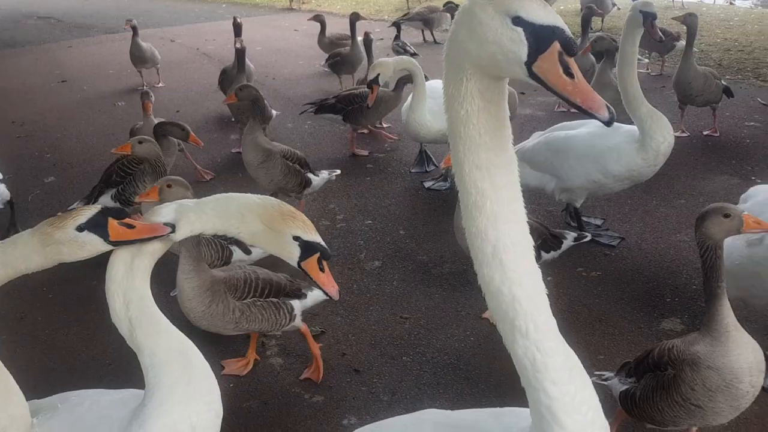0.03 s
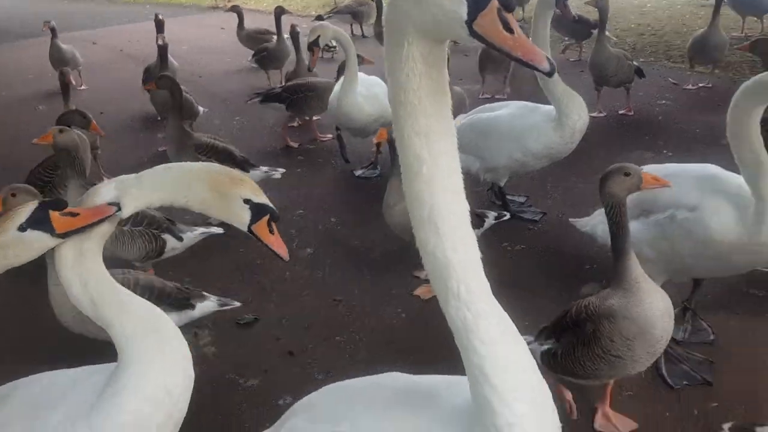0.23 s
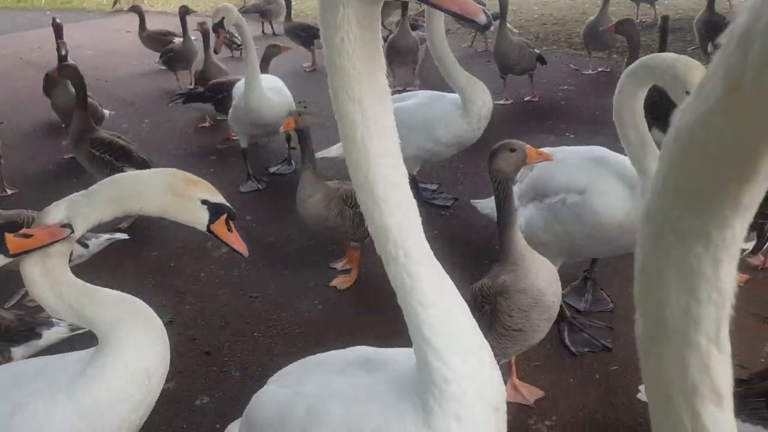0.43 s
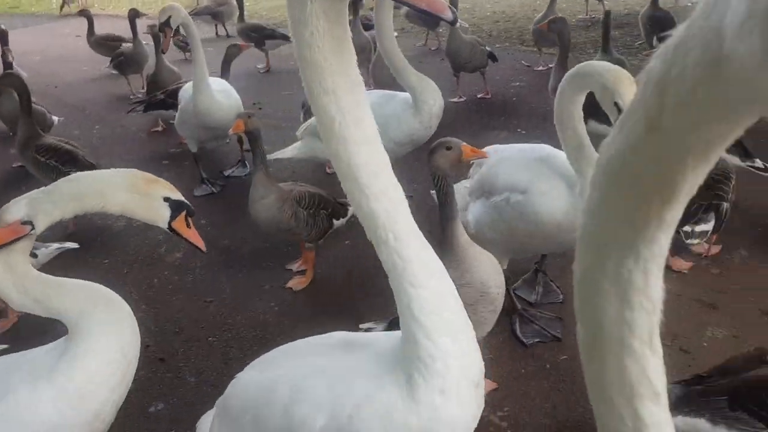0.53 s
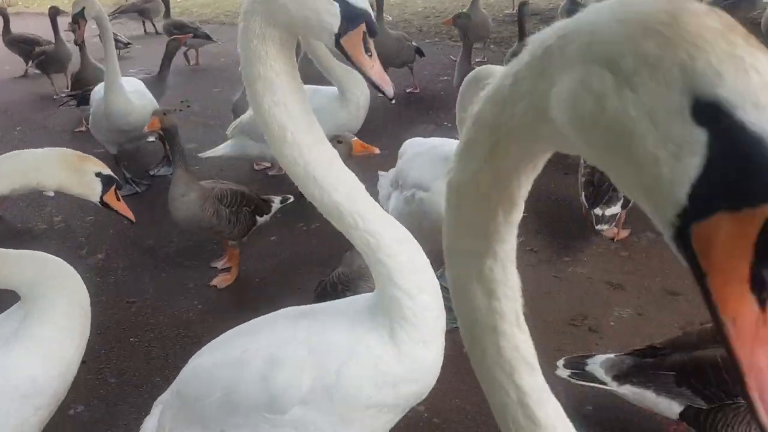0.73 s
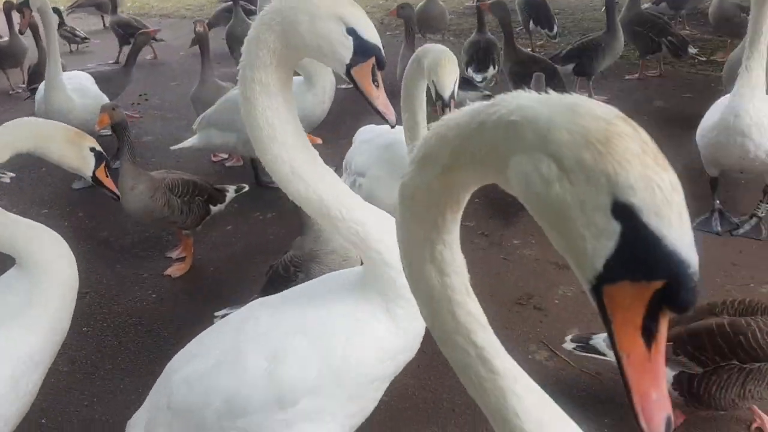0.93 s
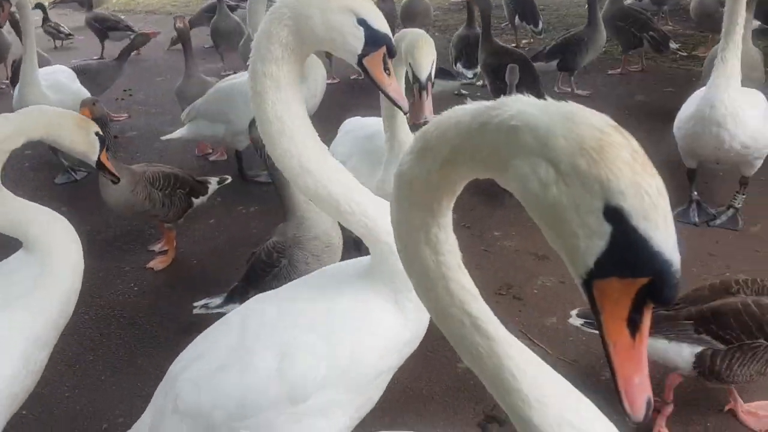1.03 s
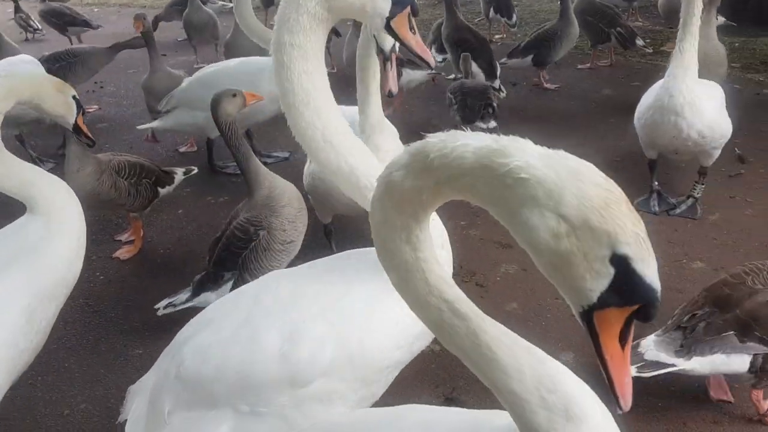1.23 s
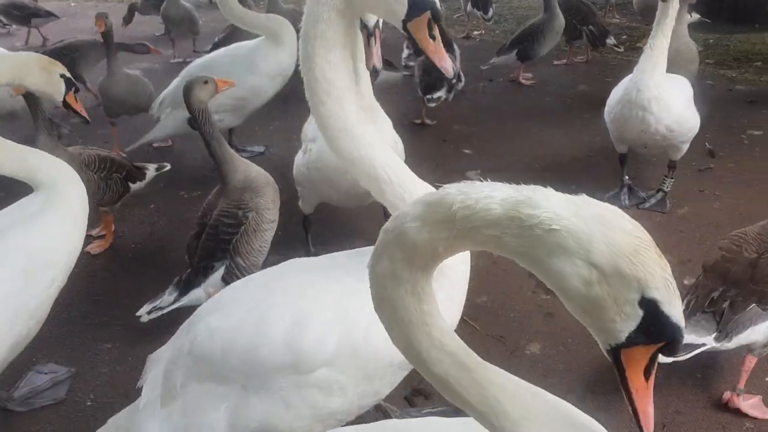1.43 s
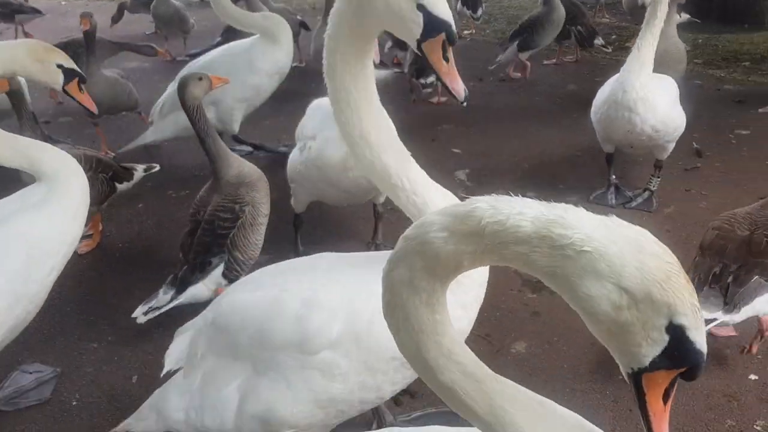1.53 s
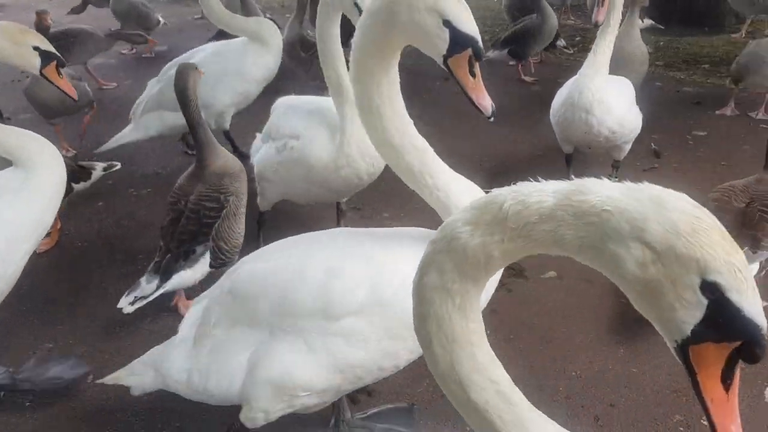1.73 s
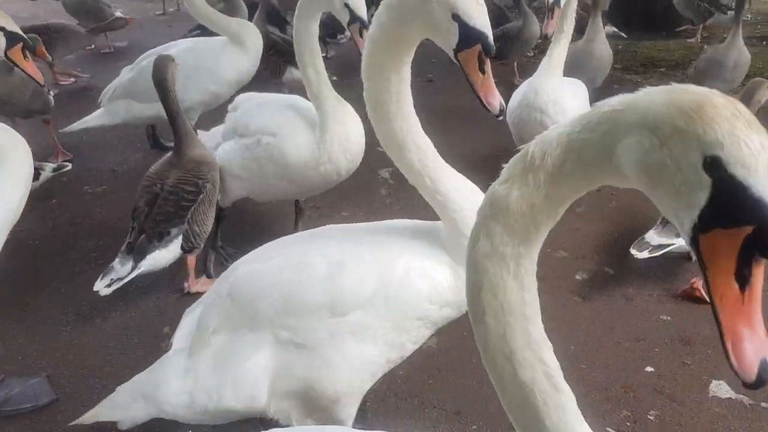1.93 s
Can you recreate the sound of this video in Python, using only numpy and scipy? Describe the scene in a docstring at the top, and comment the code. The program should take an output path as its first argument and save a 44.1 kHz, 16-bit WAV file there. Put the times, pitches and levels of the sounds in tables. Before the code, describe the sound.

A flock of geese calls in short nasal cackles and honks over faint ticks.

```python
"""Geese on a park path.

Greylag geese and swans crowd round. Near geese cackle in short nasal syllables, others honk higher:
each call is a train of syrinx pulses filtered by throat, mouth and bill. After a brief rustle,
something, perhaps a beak, knocks twice on the microphone's housing. Beaks and feet tick and scuff
on the asphalt, and air buffets the microphone over the hum of the distant flock."""
import sys
import numpy as np
from scipy import signal
from scipy.fft import rfft, irfft
from scipy.io import wavfile

SR = 44100
rng = np.random.default_rng(int(sys.argv[2]) if len(sys.argv) > 2 else 0)


def unload_audio(sound):
    """Save the sound as a 16-bit wav file, at the path given as the first command line argument."""
    columns = np.transpose(np.atleast_2d(sound))
    # keep every value between -1 and 1, then stretch to whole-number steps
    steps = np.round(np.clip(columns, -1, 1) * 32767)
    wavfile.write(sys.argv[1], SR, steps.astype(np.int16))


N = 88200


def from_db(db):
    """Amplitude ratio: tenfold for every 20 dB."""
    return 10 ** (np.asarray(db) / 20)


def decay(t, t60):
    """Exponential damping: 60 dB down after t60 seconds."""
    return from_db(-60 * t / t60)


def rms_one(x):
    """Normalisation to unit power."""
    return x / np.sqrt(np.mean(x ** 2) + 1e-20)


def level(rows):
    """Gain over time, interpolated in decibels."""
    return from_db(np.interp(np.arange(N) / SR, *np.transpose(rows)))


def swell(u, attack=.27, release=.34):
    """Envelope with sinusoidal attack and release over u = 0..1."""
    return np.sin(np.pi / 2 * np.clip(np.minimum(u / attack, (1 - u) / release), 0, 1))


def pan(db):
    """Level difference: left exceeds right by db."""
    return from_db([[db / 2], [-db / 2]])


def place(x, db, lag_s):
    """Direction from level and time differences: the right port hears x lag_s later."""
    t = np.arange(len(x)) / SR
    return pan(db) * np.array([x, np.interp(t - lag_s, t, x)])


def add(out, start, x):
    """Superposition of x from start seconds on."""
    i = int(np.clip(start * SR, 0, N - 1))
    out[..., i:i + x.shape[-1]] += x[..., :N - i]


def cut(x, hz, kind, order=2):
    """Butterworth filter."""
    sections = signal.butter(order, np.clip(hz, 10, .48 * SR), kind, fs=SR, output="sos")
    return signal.sosfilt(sections, x)


def resonate(x, hz, width_hz):
    """Damped resonator with unit peak gain."""
    r = np.exp(-np.pi * width_hz / SR)
    feedback = [1, -2 * r * np.cos(2 * np.pi * hz / SR), r * r]
    return signal.lfilter(np.array([1, 0, -1]) * (1 - r * r) / 2, feedback, x + 1e-18)


def bank(x, resonances):
    """Parallel resonators driven by one source."""
    return sum(from_db(db) * resonate(x, hz, width_hz) for hz, width_hz, db in resonances)


def noise(spectrum, correlation):
    """Spectrally shaped noise of unit power, with a given correlation between channels."""
    hz, db = np.transpose(spectrum)
    bins_hz = np.arange(N // 2 + 1) * SR / N
    gain = from_db(np.interp(np.log(bins_hz + 1), np.log(hz), db))
    mid, side = irfft(rfft(rng.standard_normal((2, N))) * gain, N)
    return rms_one(np.sqrt(1 + correlation) * mid + np.sqrt(1 - correlation) * side * [[1], [-1]])


# The park's hush and the far flock's hum. Each row: frequency in Hz, relative spectral density in dB.
HUSH_SPECTRUM = [(60, -3.5), (150, -1.5), (250, -1), (350, -9.5), (520, -11.5), (640, -8.5), (1250, -21),
                 (1650, -37), (2200, -30), (3100, -55), (4300, -49), (7000, -48), (10000, -32.5),
                 (15000, -34)]
FAR_SPECTRUM = [(100, -16), (220, -4.5), (400, 2), (550, -6), (800, 3), (1200, 1.5), (1600, -5),
                (2300, -11), (3100, -10), (4200, -14.5), (7000, -24), (15000, -35.5)]
# The hum's rise and fall. Each row: time in seconds, level in dB.
FAR_LEVEL = [(0, -55), (.3, -54.5), (.85, -71), (1.07, -58.5), (1.25, -56), (1.5, -50), (1.8, -47.5),
             (1.95, -56), (2, -51)]


def background():
    """Incoherent summation: distant calls blur into noise above a steady hush."""
    hush = from_db(-60) * noise(HUSH_SPECTRUM, correlation=1)
    far_flock = level(FAR_LEVEL) * noise(FAR_SPECTRUM, correlation=.13)
    return pan(-1) * (hush + far_flock)


# Gusts. Each row: time in seconds, relative level in dB.
BUFFET_LEVEL = [(0.0, -41), (0.03, -35), (0.05, -39.5), (0.14, -35.5), (0.18, -42.5), (0.26, -33.5),
                (0.28, -55), (0.33, -42), (0.38, -60.5), (0.45, -44.5), (0.47, -59), (0.53, -39),
                (0.57, -65), (0.63, -43.5), (0.83, -55), (0.85, -46), (0.93, -67), (0.97, -43), (1.06, -60),
                (1.1, -46.5), (1.38, -59.5), (1.44, -38), (1.49, -52.5), (1.87, -53), (1.89, -41.5),
                (2.0, -59.5)]
# Their rumble. Each row: frequency in Hz, relative spectral density in dB.
BUFFET_SPECTRUM = [(20, -45), (30, -32), (44, 1), (68, 1.5), (110, -4.5), (200, -15), (400, -27.5),
                   (1000, -58)]


def buffet():
    """Turbulence: air at the microphone makes low-frequency pressure fluctuations."""
    return from_db(1.5) * level(BUFFET_LEVEL) * noise(BUFFET_SPECTRUM, correlation=.35)


# Handling noise. Each row: time in seconds, level in dB.
RUSTLE_LEVEL = [(0, -47), (.1, -46), (.2, -46), (.25, -48.5), (.29, -69.5), (.4, -82), (.5, -120)]
# Its timbre. Each row: frequency in Hz, relative spectral density in dB.
RUSTLE_SPECTRUM = [(100, -7), (400, -2), (1000, -2.5), (2200, -7.5), (4500, -15), (8000, -30),
                   (14000, -23.5), (17000, -26)]


def rustle():
    """Friction: handling the microphone makes brief broadband noise."""
    return level(RUSTLE_LEVEL) * pan(-2) * noise(RUSTLE_SPECTRUM, correlation=.16)


# Ticks of beaks and grit. Each row: start in seconds, level in dB, centre in Hz, T60 in seconds.
GRIT_TICKS = [(0.1017, -41.5, 4800, 0.024), (.128, -54, 6000, 0.013), (0.146, -39.5, 5740, 0.023),
              (.233, -34.5, 4170, 0.0066), (.306, -47, 1950, 0.088), (.308, -56.5, 5570, 0.036),
              (0.415, -48.5, 4370, 0.042), (0.49, -56, 3700, 0.056), (0.5774, -55.5, 4170, 0.044),
              (.6, -49.5, 2130, 0.033), (0.7805, -61.5, 10800, 0.039), (0.7965, -53.5, 6000, .02),
              (0.9461, -39.5, 5250, 0.016), (1.035, -53, 9450, 0.0095), (1.1847, -48, 4630, 0.027),
              (1.366, -41, 5100, 0.012), (1.3853, -39.5, 4800, 0.034), (1.52, -43.5, 5300, 0.0092),
              (1.66, -47, 5600, 0.018), (1.8229, -36, 4640, 0.016)]


def ticks():
    """Impact noise: each small crunch is a broad, decaying resonance with fizz above it."""
    out, t = np.zeros((2, N)), np.arange(SR // 10) / SR
    for start, db, hz, t60 in GRIT_TICKS:
        grit = rng.standard_normal((2, len(t))) + rng.standard_normal(len(t))
        tone = rms_one(resonate(resonate(grit, hz, width_hz=.18 * hz), hz, width_hz=hz))
        fizz = from_db(-7.5) * rms_one(cut(grit, 10900, "high"))
        add(out, start, from_db(db) * decay(t, t60) * (tone + fizz))
    return out


# Rubs and scuffs. Each row: start and length in seconds, level in dB, low and high band edges in Hz,
# left over right in dB.
SCUFFS = [(0.186, 0.025, -27, 107, 605, 11.5), (0.224, 0.015, -29, 202, 895, -4),
          (0.938, 0.013, -37, 285, 1800, -5), (1.19, 0.033, -58.5, 3500, 16000, -6),
          (1.208, 0.016, -49, 11000, 15600, 3), (1.362, 0.011, -41.5, 1300, 2780, -3),
          (0.29, 0.0051, -52, 12900, 16200, -13), (0.402, 0.03, -49.5, 304, 790, 1),
          (1.65, 0.02, -51.5, 680, 2440, 5)]


def scuffs():
    """Sliding friction gives bands of noise: dull on the housing, bright on the asphalt."""
    out, t = np.zeros((2, N)), np.arange(SR // 10) / SR
    for start, length, db, low_hz, high_hz, side_db in SCUFFS:
        grit = rms_one(cut(rng.standard_normal((2, len(t))), [low_hz, high_hz], "band", order=3))
        add(out, start, from_db(db) * pan(side_db) * swell(t / length) * grit)
    return out


# The housing's modes. Each row: frequency in Hz, gain in dB, T60 in seconds, left over right in dB.
HOUSING_MODES = [(71.6, -23.5, 0.039, -16.5), (125, -6, 0.022, -1), (256, -11.5, 0.042, 3.5)]
# Resonances of the crack. Each row: centre and bandwidth in Hz, gain in dB.
CRACK_BANDS = [(2270, 1000, 8), (4230, 500, 4.5), (6230, 250, -4)]
# Blows on the housing. Each row: start in seconds, gain in dB, contact pitch in Hz, crack gain in dB.
HOUSING_KNOCKS = [(0.1748, 3, 343, -23.5), (0.2191, -1, 657, -12)]


def knocks(side_db=-11.5, zing_hz=13800):
    """Impulse excitation: a heavy contact pulse, topped by a crack, rings the housing's modes."""
    out, t = np.zeros((2, N)), np.arange(SR // 6) / SR

    def ring(hz, t60):
        return -np.sin(2 * np.pi * hz * t) * decay(t, t60)

    for start, db, hz, crack_db in HOUSING_KNOCKS:
        contact = place(cut(ring(hz, t60=.0061), 2.86 * hz, "low"), side_db, lag_s=.0001)
        body = sum(from_db(mode_db) * pan(mode_side_db) * ring(mode_hz, t60)
                   for mode_hz, mode_db, t60, mode_side_db in HOUSING_MODES)
        body *= [[1], [-1]]  # the housing rocks, so its two ports move in antiphase
        burst = rng.standard_normal((2, len(t))) * decay(t, t60=.0034)
        zing = resonate(resonate(burst, zing_hz, 3400), zing_hz, 3400)
        crack = cut(bank(burst, CRACK_BANDS), 6020, "low", order=6) + from_db(-2) * zing
        add(out, start, from_db(db) * (contact + from_db(crack_db) * pan(side_db) * crack))
        add(out, start + .5 / hz, from_db(db) * cut(body, 470, "low"))  # half a contact cycle later
    return out


def park_reverb(x, dull_hz=4860):
    """Diffuse reflection: ground, bodies and trees return a faint, dull tail."""
    t = np.arange(SR // 2) / SR
    tail = cut(rng.standard_normal((2, len(t))), dull_hz, "low") * decay(t, t60=.13) * (t > .004)
    tail /= np.sqrt(np.sum(tail ** 2) / 2 * SR / 2 / dull_hz)  # about unit gain in the passband
    return from_db(-15) * signal.fftconvolve(x[None], tail, axes=1)[:, :N]


def scatter(x):
    """Early reflections from the ground and nearby bodies smear each pulse, anew for every call."""
    t = np.arange(SR // 30) / SR
    spray = rng.standard_normal(len(t)) * decay(t, t60=.06) * (t > .001)
    return x + from_db(-1) * signal.fftconvolve(x, spray / np.linalg.norm(spray))[:len(x)]


def syrinx(hz, rough, jitter=.037, shimmer_db=11.5):
    """Valved airflow: a pulse and a puff each cycle; roughness adds irregularity and breath."""
    wobble, shimmer, air = rng.standard_normal((3, len(hz)))
    phase = np.cumsum(hz * (1 + jitter * rough * rms_one(cut(wobble, 150, "low")))) / SR
    pulses = np.diff(np.floor(phase), prepend=0) * from_db(shimmer_db * rough * shimmer)
    puffs = rms_one(air * np.exp(-2 * (phase % 1)))
    voice = (1 - rough) * rms_one(pulses) + rough * puffs
    return voice, puffs


# The throat's formants in three registers. Each row: centre and bandwidth in Hz, gain in dB.
LOW_FORMANTS = [(730, 170, -4), (1000, 200, -7), (1220, 150, -4)]
HIGH_FORMANTS = [(1730, 100, -15.5), (2105, 860, -16), (3670, 220, -13.5)]
EDGE_FORMANTS = [(5830, 920, -42.5), (8060, 770, -38.5), (12530, 3000, -39.5)]
# The callers' direction. Each row: time in seconds, lag of the right channel in seconds.
CALLER_LAG = [(0, -.00016), (1.0, -.00018), (1.6, -.00016), (1.73, -.00003), (2, -.00003)]
# Low nasal syllables. Each row: start and length in seconds, peak pitch in Hz, time of that peak as a
# share of the length, level in dB, mouth resonance in Hz, roughness from 0 to 1, treble gain in dB,
# bill resonance in Hz, further gain of the edge formants in dB.
CACKLE_CALLS = [(.04, 0.097, 142.5, 0.37, -37, 1057, 0.22, -5, 1970, -2),
                (.335, 0.13, 168.4, 0.39, -53, 1404, 0.57, -5.5, 1500, 1.5),
                (.64, 0.097, 120.1, 0.52, -53, 756, 0.15, -3.5, 4100, 2),
                (.87, 0.0745, 162.6, 0.62, -47, 1034, 0.22, 0, 3160, 3),
                (.944, .098, 150.3, 0.48, -39.5, 1050, 0.2, 0, 2660, -0.5),
                (1.087, 0.089, 135.9, 0.73, -43.5, 1065, 0.12, -8, 3940, 1.5),
                (1.178, 0.077, 165.5, 0.29, -40, 803, 0.12, -2.5, 1530, 4),
                (1.22, 0.086, 141.2, .62, -42, 1054, 0.2, -6, 2500, 3),
                (1.333, 0.076, 165.1, 0.51, -42, 860, 0, -4, 1750, 2),
                (1.355, 0.09, 145.3, 0.42, -41, 1174, 0.01, -5, 4000, -4),
                (1.47, 0.084, 139.3, .55, -39.5, 1150, 0.2, -7.5, 2080, 0),
                (1.512, 0.059, 162.4, 0.95, -39.5, 990, 0.08, -5.5, 1860, -1),
                (1.665, 0.076, 140.6, 0.72, -38, 1010, 0.23, -5.5, 3930, -3.5),
                (1.755, 0.062, 153, 0.63, -46.5, 860, 0.25, -36, 2140, -6),
                (1.958, 0.037, 137.3, 0.26, -45.5, 1200, 0.31, -23.5, 3640, 0)]
# Higher honks, with the same columns.
HONK_CALLS = [(.22, 0.036, 300.4, 0.35, -45.5, 1200, .25, -30, 2160, -23),
              (.35, 0.085, 209, 0.53, -49.5, 1124, 0.11, -38, 2000, -10),
              (.545, .112, 213.5, 0.72, -54, 1134, 0.054, -1, 1980, -16),
              (.72, .108, 209.8, 0.47, -53.5, 1135, 0.088, 1, 2000, -8),
              (1.44, 0.054, 380, -0.1, -38.5, 1253, 0.29, -4.5, 2350, -28),
              (1.562, 0.04, 300.3, 0.4, -44, 920, 0.024, 4, 2800, -19),
              (1.605, .062, 315, 0.63, -46.5, 904, 0.024, 4, 1860, -19),
              (1.716, .044, 167.8, .25, -32.5, 1193, 0.24, -5.5, 2180, -12),
              (1.803, 0.054, 313, -0.018, -47, 1170, 0.28, -14, 2330, -11),
              (1.851, 0.016, 280, 0.2, -39, 1110, 0.15, -11, 2280, 5),
              (1.851, 0.054, 316.7, 0.61, -37.5, 973, 0.039, 3.5, 2550, -3),
              (1.889, 0.028, 323, -0.011, -35.5, 1330, 0.27, -0.5, 2270, 1)]


def geese(calls, mouth_width_hz, mouth_db, low_cut_hz, sag, arch_s=.046, crossover_hz=4140):
    """Source and filter: syrinx pulses on an arch of pitch ring in throat, mouth and bill."""
    out, t = np.zeros((2, N)), np.arange(SR // 6) / SR
    for start, length, peak_hz, peak_at, db, mouth_hz, rough, treble_db, bill_hz, edge_db in calls:
        arch = np.exp(-((t - peak_at * length) / arch_s) ** 2)
        voice, puffs = syrinx(peak_hz * (1 - sag * (1 - arch)), rough)
        rasp = voice + (.79 + rough) * puffs
        mouth, bill = (mouth_hz, mouth_width_hz, mouth_db), (bill_hz, 210, -8)
        low = cut(bank(voice, LOW_FORMANTS + [mouth]), 1067, "low")
        high = cut(bank(rasp, HIGH_FORMANTS + [bill]), crossover_hz, "low", order=4)
        edge = from_db(edge_db) * cut(bank(rasp + puffs, EDGE_FORMANTS), crossover_hz, "high")
        radiated = cut(low + from_db(treble_db) * (high + edge), low_cut_hz, "high", order=7)
        envelope = swell(t / length)
        call = scatter(envelope * radiated)
        power = np.sum(call ** 2) / np.sum(envelope ** 2)
        lag_s = np.interp(start, *np.transpose(CALLER_LAG))
        add(out, start, place(from_db(db) * call / np.sqrt(power), db=-2.2, lag_s=lag_s))
    return out


def scene():
    """Superposition of the near flock, its reverberation, small contacts and the ambient noise."""
    cackles = geese(CACKLE_CALLS, mouth_width_hz=180, mouth_db=1.5, low_cut_hz=648, sag=.17)
    honks = geese(HONK_CALLS, mouth_width_hz=90, mouth_db=17, low_cut_hz=763, sag=.11)
    flock = cackles + honks
    reverb = park_reverb(flock.mean(axis=0))
    return flock + reverb + knocks() + scuffs() + ticks() + buffet() + rustle() + background()


def record(dry):
    """Band limiting and clipping: deep rumble is removed, peaks are capped and the top is cut."""
    clipped = np.clip(cut(dry, 32, "high"), -.95, .95)
    low_pass = signal.ellip(10, .1, 80, 16300, fs=SR, output="sos")
    return signal.sosfilt(low_pass, clipped)


dry = scene()
out = record(dry)
unload_audio(out)
```